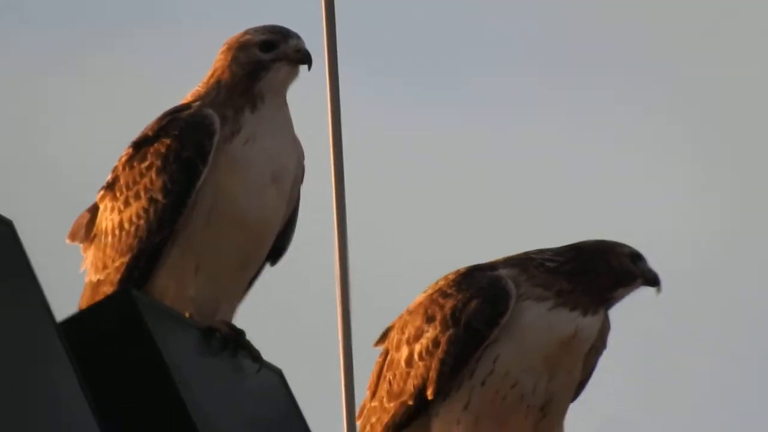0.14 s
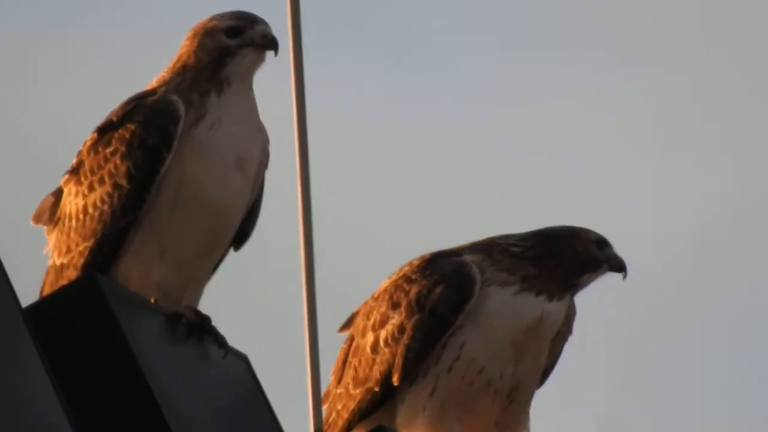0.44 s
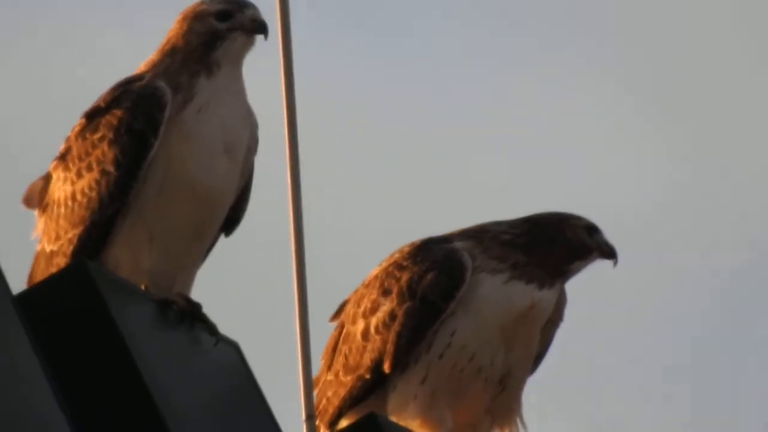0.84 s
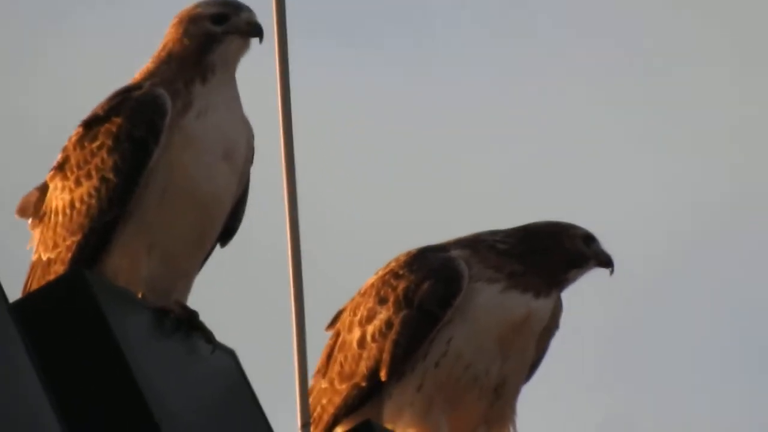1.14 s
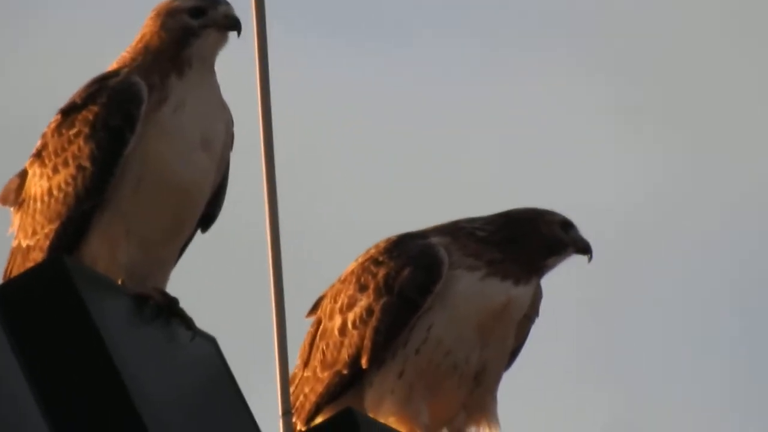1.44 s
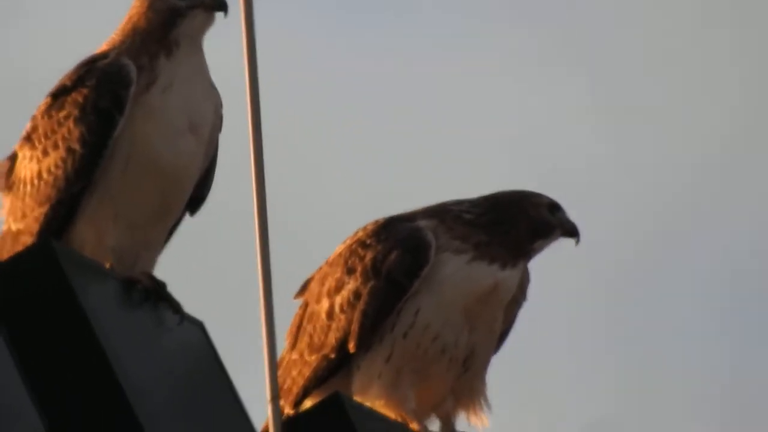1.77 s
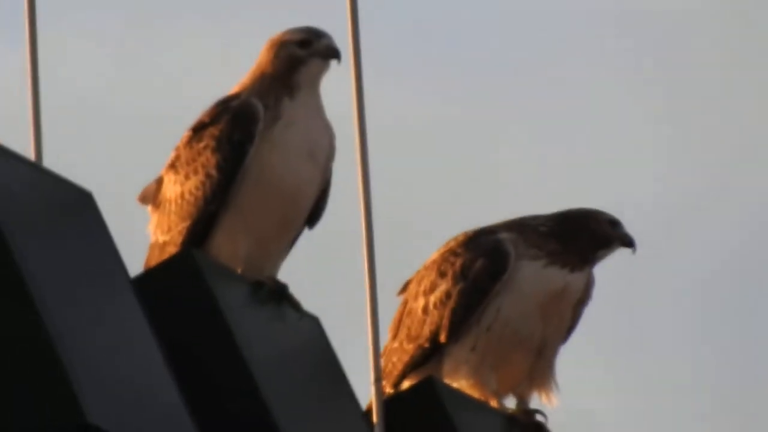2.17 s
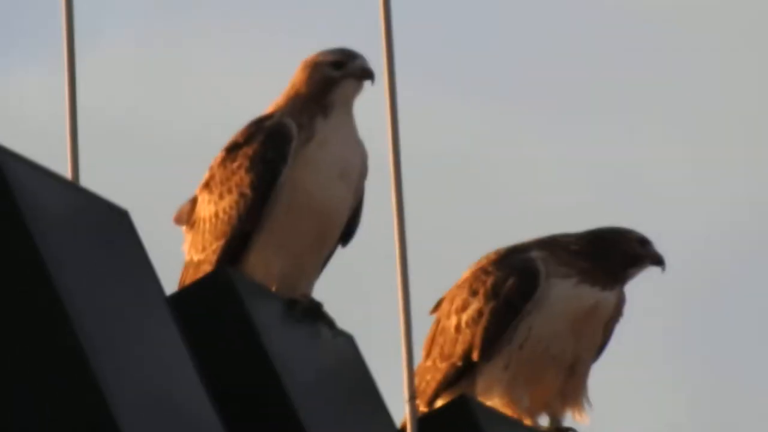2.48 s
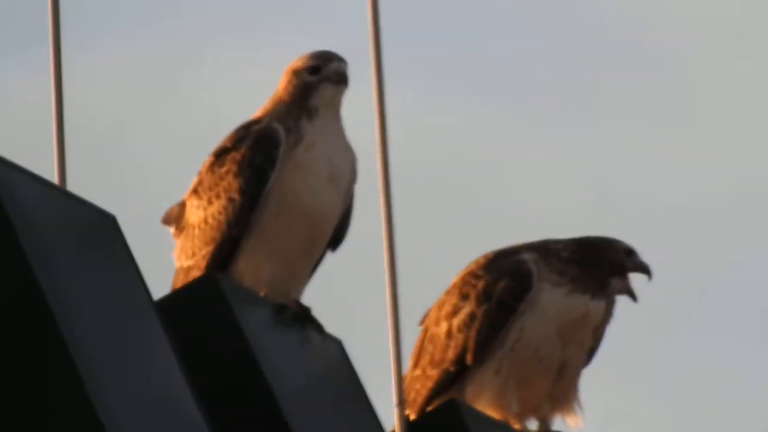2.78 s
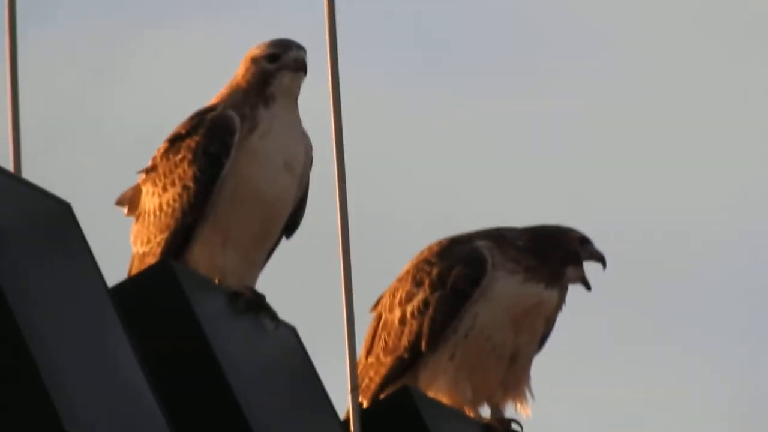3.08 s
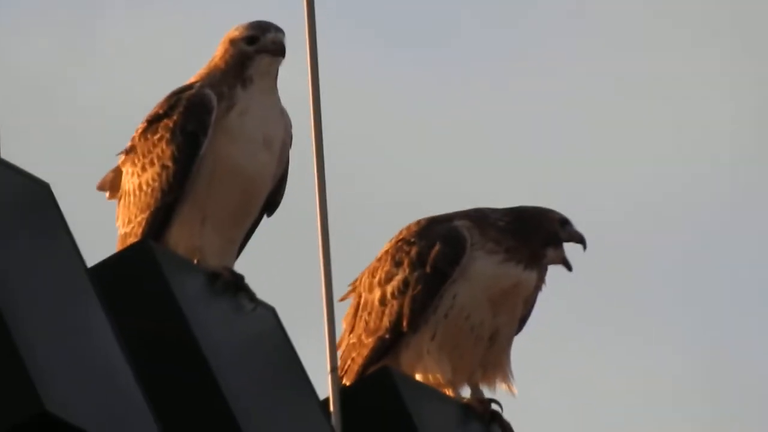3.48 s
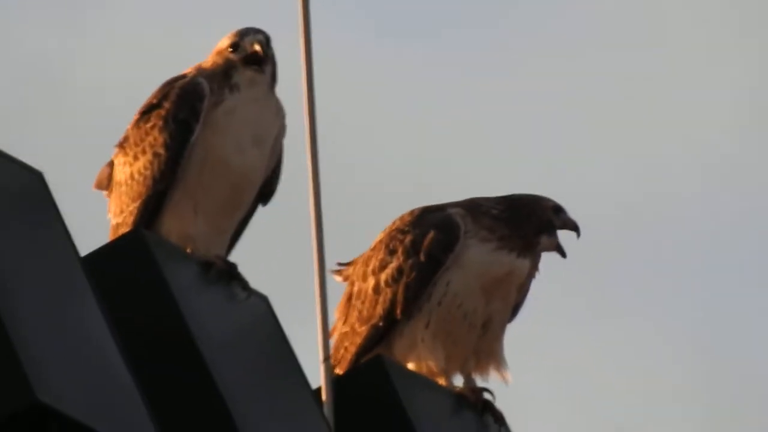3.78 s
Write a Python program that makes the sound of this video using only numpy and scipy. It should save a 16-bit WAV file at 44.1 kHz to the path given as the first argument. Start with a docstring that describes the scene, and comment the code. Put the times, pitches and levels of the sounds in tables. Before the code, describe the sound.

A hawk screams once, harsh and raspy, over a steady low outdoor drone.

```python
"""A hawk on a roof screams once, hoarsely: throat-filtered rasp pulses under a lower voice, whistles and yelps.
Before it the camera's lens motor whirs for a second: shaped hiss, gear ticks and whines tied to the gear speed.
Meanwhile fingers creak and click on the plastic body: slip pulses through resonances, and decaying modes.
Behind lies a drone of machinery and far traffic: wavering tones over shaped noise.
"""
import sys
import numpy as np
from scipy import signal
from scipy.fft import rfft, irfft, next_fast_len
from scipy.io import wavfile
from scipy.ndimage import uniform_filter1d, map_coordinates

SR = 44100
rng = np.random.default_rng(int(sys.argv[2]) if len(sys.argv) > 2 else 0)


def transcribe(u):
    """Save the signal u as a 16-bit wav file named by the first command-line argument.

    u: samples, shape (n,) or (channels, n), limited to [-1, 1]; the rate is SR.
    q: integer samples, one column per channel.
    """
    v = np.clip(np.atleast_2d(u).T, -1, 1)
    q = np.round(v * 32767).astype(np.int16)
    wavfile.write(sys.argv[1], SR, q)


N = 172872


def amp(db):
    """Decibels to a linear gain."""
    return 10 ** (np.asarray(db) / 20)


def unit(x):
    """x scaled to rms 1."""
    return x / np.sqrt(np.mean(x ** 2) + 1e-20)


def along(points, hz):
    """Interpolate (f, value) points on a log frequency axis."""
    f, v = np.transpose(points)
    return np.interp(np.log(hz + 1), np.log(f + 1), v)


def curves(rows):
    """One value per sample for each column, and a gate that is open while the table lasts."""
    s, *cols = np.transpose(rows)
    t = np.arange(N) / SR
    is_open = 1. * (t > s[0]) * (t < s[-1])
    gate = uniform_filter1d(is_open, size=400, mode="nearest")
    return [np.interp(t, s, c) for c in cols] + [gate]


def wobble(rate):
    """A smooth random curve, rate knots a second."""
    knots = rng.standard_normal(int(N * rate / SR) + 4)
    return map_coordinates(knots, [np.arange(N) * rate / SR])


def tone_phase(hz):
    """Running phase in radians of a tone whose pitch follows the curve hz."""
    return np.cumsum(2 * np.pi * hz) / SR


def filtered(x, response):
    """x times a complex response of frequency."""
    m = next_fast_len(N + SR // 2)
    return irfft(rfft(x, m) * response(np.fft.rfftfreq(m, 1 / SR)), m)[..., :N]


def resonant(x, peaks):
    """x through parallel (f, width, level) resonances of alternating sign."""
    def response(f):
        return sum((-1) ** k * amp(db) * 1j * f * w / (c * c - f * f + 1j * f * w)
                   for k, (c, w, db) in enumerate(peaks))
    return filtered(x, response)


def soft(x, hz):
    """A steep roll-off above hz."""
    return filtered(x, lambda f: 1 / (1 + 1j * f / hz) ** 4)


def stroke(s, length, shape):
    """A hump from s lasting length seconds; small shape = flat top."""
    progress = np.clip((np.arange(N) / SR - s) / length, 0, 1)
    return np.abs(np.sin(np.pi * progress)) ** shape * (np.arange(N) < (s + length) * SR)


def pulses(rate, jitter, scatter_db):
    """Clicks at about rate a second, uneven in time and size."""
    turns = np.cumsum(rate * np.exp(jitter * wobble(np.mean(rate) / 2))) / SR
    return np.diff(np.floor(turns), prepend=0) * amp(scatter_db * rng.standard_normal(N))


def rush(spectrum, alike, patchy_db):
    """Stereo noise of rms 1 with patches of random gain."""
    z = signal.stft(rng.standard_normal((2, N)), nperseg=512)[2]
    field = uniform_filter1d(rng.standard_normal(z.shape[1:]), size=6, axis=0)
    field = uniform_filter1d(field, size=14, axis=1)
    pair = signal.istft(z * amp(patchy_db * unit(field)), nperseg=512)[1][:, :N]

    def mid_side(hz):
        turn = np.arccos(np.clip(along(alike, hz), -1, 1)) / 2
        return amp(along(spectrum, hz)) * [np.cos(turn), np.sin(turn)]
    mid, side = filtered(pair, mid_side)
    return unit(np.array([mid + side, mid - side]))


def pan(db):
    """Left and right gains; positive db favours the left."""
    return amp([[db / 2], [-db / 2]])


# Breathy scream before its level trim: t/s, level/dB, upper throat band relative level/dB
RASP = [(2.845, -54, -21), (2.866, -41.5, -19), (2.9, -43.5, -9), (2.94, -41, -1), (3.0, -39.5, -4.5),
        (3.08, -38.5, -8.5), (3.2, -40, -8), (3.55, -39.5, -6), (3.7, -38.5, -9), (3.93, -39.5, -7.5)]
# Throat resonances, each passed twice: f/Hz, width/Hz, level/dB
THROAT = [(1780, 460, -4), (2293, 330, 3.5), (2876, 640, 3), (3730, 570, -4.5)]
# Upper throat resonances, each passed twice: f/Hz, width/Hz, level/dB
UPPER_THROAT = [(4440, 960, 0.44), (5330, 690, 2.6), (5844, 450, -0.41)]


def rasp():
    """Uneven membrane pulses and breath noise excite two bands of throat resonance."""
    db, upper_db, gate = curves(RASP)
    source = pulses(np.full(N, 1323), jitter=.5, scatter_db=-4.5)
    source = unit(source - source.mean()) + 2.0 * rng.standard_normal(N)  # pulses plus breath
    low, high = (unit(resonant(resonant(source, p), p)) for p in (THROAT, UPPER_THROAT))
    low_gain = amp(-3 + 1.7 * wobble(60))
    high_gain = amp(upper_db + 1.5 * wobble(60))
    return gate * amp(db) * (low_gain * low + high_gain * high)


# Glide of the lower voice: t/s, f/Hz
VOICE = [(3.09, 1390), (3.13, 1347), (3.17, 1298), (3.25, 1288), (3.31, 1259), (3.37, 1284), (3.425, 1320),
         (3.51, 1303), (3.56, 1358), (3.7, 1375), (3.76, 1383)]
# Spells in which it locks in: start t/s, end t/s, fundamental level/dB, even overtones level/dB before trim
SPELLS = [(3.09, 3.162, -46, -45.5), (3.166, 3.228, -45, -41.5), (3.226, 3.428, -44.5, -41.5),
          (3.501, 3.562, -49.5, -43), (3.586, 3.676, -56, -49), (3.686, 3.755, -54.5, -50)]
RAGGED_FROM_S, RAGGED = 3.53, 3  # late on, pitch and fundamental shake this many times more


def lower_voice():
    """A shaky periodic voice of fundamental, second and fourth harmonics locks in by spells."""
    hz, _ = curves(VOICE)
    ragged = np.where(np.arange(N) > RAGGED_FROM_S * SR, RAGGED, 1)
    phase = tone_phase(hz + 15 * ragged * wobble(400))
    first = amp(1.8 * ragged * wobble(60)) * np.sin(phase)
    even = amp(2.2 * wobble(150)) * (np.sin(2 * phase) + amp(-14) * np.sin(4 * phase))
    return sum(stroke(start, end - start, 0.18) * (amp(first_db + 3) * first + amp(even_db + 6.0) * even)
               for start, end, first_db, even_db in SPELLS)


def whistle(rows, rough, multiple=1):
    """A sine whose pitch and size shake more the rougher it is."""
    hz, db, gate = curves(rows)
    phase = tone_phase(hz + 300 * rough * wobble(500))
    return gate * amp(db + 3 + 9 * rough * wobble(400)) * np.sin(multiple * phase)


# Opening arch of the thin upper whistle: t/s, f/Hz, level/dB
WHISTLE = [(2.86, 2680, -54), (2.876, 3050, -37), (2.915, 3310, -36.5), (2.93, 3560, -44.5),
           (2.945, 3400, -35.5), (2.99, 3360, -45), (3.03, 3094, -42), (3.09, 3040, -41.5),
           (3.12, 2745, -67)]
# Partials while the whistle doubles its period: multiple of its pitch, level/dB
HALVES = [(.5, -19), (1.5, -8), (2.5, -25)]
# Strength of the period doubling: t/s, level/dB
DOUBLING = [(2.87, -3), (2.93, -4), (3.05, 1)]


def opening_whistle():
    """A rough sine, with partials at half-multiples while its period doubles."""
    db, gate = curves(DOUBLING)
    partials = sum(amp(h_db) * whistle(WHISTLE, rough=.33, multiple=k) for k, h_db in HALVES)
    return whistle(WHISTLE, rough=0.27) + gate * amp(db) * partials


# Late return of the whistle: t/s, f/Hz, level/dB
WHISTLE_LATE = [(3.42, 3020, -48), (3.45, 3070, -41.5), (3.505, 3045, -41), (3.53, 2833, -56.5),
                (3.565, 2918, -39.5), (3.6, 3060, -41.5), (3.635, 3000, -38.5), (3.76, 3108, -37.5),
                (3.86, 3010, -37.5), (3.885, 2980, -40), (3.93, 3090, -38)]
# Rougher strands under it: offset f/Hz, relative level/dB
STRANDS = [(-320, -13), (-700, -7.5)]


def late_whistle():
    """A rough sine and two lower strands, held in a steep band from 2100 to 3300 Hz."""
    late = whistle(WHISTLE_LATE, rough=.3)
    late = late + sum(whistle(np.add(WHISTLE_LATE, [0, *strand]), rough=0.442) for strand in STRANDS)
    return filtered(late, lambda f: 1 / (1 + (f / 3300) ** 24) / (1 + (2100 / (f + 1)) ** 24))


# Cracks as the voice sets in: t/s, length/s, f/Hz, level/dB before trim
YELPS = [(2.862, 0.016, 2550, -43), (2.914, 0.011, 4910, -38.5), (2.932, 0.015, 4700, -36.5),
         (3.001, 0.063, 1034, -56.5)]


def yelps():
    """Brief sine bursts share one pitch shake, scaled to each pitch."""
    shake = 120 * wobble(300)
    return sum(amp(db + 6.5) * stroke(s, length, 0.68) * np.sin(tone_phase(hz + shake * hz / 5000))
               for s, length, hz, db in YELPS)


def hawk():
    """Rasping membrane pulses in the throat, with pitched voices and cracks on top."""
    return rasp() + lower_voice() + yelps() + opening_whistle() + late_whistle()


# Decay of the echo off nearby walls: f/Hz, t60/s
AIR = [(1000, 0.038), (9000, 0.69)]


def walls(x):
    """Each frequency of the echo dies at its own speed, after a gap of 500 samples."""
    hz, t, z = signal.stft(rng.standard_normal((2, SR // 2)), SR, nperseg=256)
    tail = signal.istft(z * amp(-60 * t / along(AIR, hz)[:, None]), SR, nperseg=256)[1]
    tail = tail / np.linalg.norm(tail[0])
    return signal.fftconvolve(np.pad(x, (500, 0))[None], tail, axes=1)[:, :N]


# Motor swell before panning: t/s, level/dB
MOTOR = [(1.578, -56), (1.59, -45), (1.62, -40.5), (2.2, -41.5), (2.31, -47.5), (2.325, -65), (2.385, -57),
         (2.392, -36.5), (2.43, -41.5), (2.448, -52), (2.48, -52.5), (2.494, -37.5), (2.505, -75)]
# Gear: t/s, turns a second, tick level/dB relative to the hiss
GEAR = [(1.68, 45.3, -22), (1.83, 43.5, -11), (1.93, 46, -6), (2.05, 45.8, -4), (2.21, 44.3, -6),
        (2.26, 42, -20)]
# Colour of the gear hiss: f/Hz, relative level/dB
WHIR = [(500, -6.5), (860, -4), (1250, -3.5), (1500, -13.5), (2300, -13.5), (2650, -8), (3400, -25),
        (4100, -16.5), (4800, -6), (5400, 3), (5800, -2.5), (6450, 4), (7800, -5), (8300, -12.5),
        (10500, -26), (11200, -42)]
# Gear tick resonance, passed twice: f/Hz, width/Hz, level/dB
TICK = [(6396, 220, 0)]
# Motor whine: multiple of the gear speed, peak level/dB relative to the hiss rms
WHINE = [(21, -13), (26.5, -15.5), (59, -19.5)]
# Stereo likeness of the hiss: f/Hz, left-right likeness
MOTOR_ALIKE = [(500, 0.53), (3000, 0.94), (5000, 0.11)]
HALF_TURN_DB, TICK_AT_S = -12, 2.008  # weaker second tick; time that anchors the tick count


def lens_motor():
    """Even gear hiss, and two ticks a turn, one much weaker; whines follow the gear speed."""
    db, gate = curves(MOTOR)
    speed, tick_db, _ = curves(GEAR)
    turns = np.cumsum(speed) / SR
    count = np.floor(2 * (turns - turns[round(TICK_AT_S * SR)]))
    tick_gain = amp(HALF_TURN_DB * (count % 2) + 1.5 * rng.standard_normal(N))
    ticks = np.diff(count, prepend=count[0]) * tick_gain
    puffs = signal.fftconvolve(ticks, np.exp(-np.arange(400) / (.0018 * SR)))[:N]
    ticks = unit(ticks) + .5 * unit(puffs * rng.standard_normal((2, N)))
    ticks = unit(resonant(resonant(ticks, TICK), TICK))
    hiss = rush(WHIR, MOTOR_ALIKE, patchy_db=.5) * (1 + .08 * unit(puffs))  # swells slightly with ticks
    whine = 0
    for multiple, whine_db in WHINE:
        uneven_speed = speed + 0.7 * wobble(150) + 0.5 * wobble(12)
        whine = whine + amp(whine_db + 5 * wobble(25)) * np.sin(tone_phase(multiple * uneven_speed))
    return gate * amp(db) * pan(4.5) * (hiss + amp(tick_db) * ticks + whine)


# Creaks of the grip: t/s, length/s, low ring level/dB, bright scrape level/dB (before trim and pan), ring f/Hz
CREAKS = [(1.634, .03, -45.5, -52, 680), (1.961, 0.031, -44, -84, 773), (2.046, 0.061, -43.5, -39.5, 630),
          (2.064, 0.037, -40.5, -55, 790), (2.115, 0.038, -47, -41, 1009), (2.107, 0.094, -44, -50, 619),
          (2.182, 0.045, -40.5, -40, 775), (2.306, 0.022, -39, -47, 715), (2.327, 0.051, -34.5, -41.5, 745),
          (2.413, 0.03, -38.5, -53, 790), (2.437, 0.045, -43.5, -42, 665), (2.468, 0.031, -41, -42, 773)]
# Resonances of the plastic body at rest: f/Hz, width/Hz, level/dB
SHELL = [(623, 33, 1.5), (986, 60, 0.5), (1237, 50, 0), (1740, 76, 0), (2160, 83, -4), (2510, 154, -2),
         (2740, 120, 0.5), (3600, 260, -5.5), (4920, 290, -4.5)]
SHELL_BEND = 0.06  # the squeezed shell's resonances drift by up to this share
SLIPS_PER_S, RING_RISE_HZ_PER_S, RING_SHAKE_HZ = 500, 500, 18


def grip():
    """Skin slips in quick jerks over the shell; each creak adds a squeak on a rising note."""
    out, t = np.zeros((2, N)), np.arange(N) / SR
    slips = pulses(np.full(N, SLIPS_PER_S), jitter=.6, scatter_db=2.6)
    bend = np.clip(wobble(14), -1, 1)
    scrape = 0
    for k in (-1, 0, 1):  # crossfade between lowered, resting and raised resonances
        share = np.clip(1 - np.abs(bend - k), 0, 1) ** .5
        scrape = scrape + share * resonant(slips, np.multiply(SHELL, [1 + k * SHELL_BEND, 1, 1]))
    scrape = unit(soft(scrape, hz=7760))
    shake, size = RING_SHAKE_HZ * wobble(150), amp(2.2 * wobble(120))
    for s, length, ring_db, scrape_db, hz in CREAKS:
        rise = RING_RISE_HZ_PER_S * (t - s - length / 2)
        ring = size * np.sin(tone_phase(hz + shake + rise))
        creak = amp(ring_db + 5.5) * ring + amp(scrape_db) * scrape
        out += pan(-3.5) * stroke(s, length, 0.47) * creak
    return out


# Dull knocks on the shell: t/s, level/dB before trim and pan, f/Hz
KNOCKS = [(1.5836, -27, 3600), (1.8681, -14, 1256), (2.3064, -22, 1264), (2.382, -15, 2005),
          (2.4148, -18, 1224)]
# Sharp latch snaps: t/s, level/dB before trim and pan
SNAPS = [(1.5938, -28.5), (1.8799, -7.5), (2.392, -26)]
# Latch modes: f/Hz, level/dB, t60/s
LATCH = [(4360, 3.5, 0.01), (5830, 7, 0.012), (6600, 6, 0.0049), (8940, 1, 0.0036), (12300, -18, .003)]
KNOCK_T60_S, RIGHT_LAG_RAD = 0.033, 1.7
REBOUND_S, REBOUND_DB = .002, -5


def buttons():
    """Dull knocks on the shell and sharp, rebounding snaps of a latch, all as decaying modes."""
    out, t = np.zeros((2, N + SR)), np.arange(1500) / SR
    for s, db, hz in KNOCKS:
        modes = [(hz, 0), (hz * 1.51, -5), (hz * 0.605, -1), (hz * 2.99, -8)]
        ring = sum(amp(level - 60 * t / KNOCK_T60_S) * np.sin(2 * np.pi * f * t) for f, level in modes)
        thud = uniform_filter1d(rng.standard_normal(len(t)), size=11)
        ring += 2.5 * amp(-60 * t / KNOCK_T60_S) * thud
        attack = (1 - np.exp(-t / 0.00027)) ** 2
        out[:, round(s * SR):][:, :len(t)] += amp(db - 14.5) * ring * pan(3.3) * attack
    lag = np.array([[0], [RIGHT_LAG_RAD]])
    rebounds = [(s + REBOUND_S, db + REBOUND_DB) for s, db in SNAPS]
    attack = (1 - np.exp(-t / 0.00031)) ** 2
    for s, db in [*SNAPS, *rebounds]:
        ring = sum(amp(level + rng.normal(0, 1) - 60 * t / t60) * np.sin(2 * np.pi * hz * t - lag)
                   for hz, level, t60 in LATCH)
        out[:, round(s * SR):][:, :len(t)] += amp(db - 5) * pan(3) * ring * attack
    return out[:, :N]


# Machine tones: f/Hz, starting level/dB before trim, waver/Hz, drift/dB a second
HUM = [(54.3, -47, 2, 1.5), (77.65, -36.5, 2.874, 1), (105.75, -28.5, 1.19, -0.5),
       (157.96, -36.5, 1.99, -0.5), (425, -49.5, 0.98, -2)]
# Colour of the broad rumble before its low cut: f/Hz, relative level/dB
RUMBLE = [(20, -28), (84, -6), (109, -0.5), (176, -5), (215, -11), (300, -23.5), (426, -24), (600, -34.5),
          (780, -81)]
# Colour of the thin hiss: f/Hz, relative level/dB
HISS = [(350, -23), (600, -2.5), (1180, -11.5), (1700, -15.5), (2800, -21), (3500, -18), (6850, -16),
        (7700, -22), (11000, -28), (15600, -35)]
# Stereo likeness of rumble and hiss: f/Hz, left-right likeness
ALIKE = [(400, 0.99), (1400, 0.87), (3100, 0.35), (7000, 0.079)]


def drone():
    """Wavering machine tones over a broad rumble and a thin hiss."""
    t = np.arange(N) / SR
    hum = 0
    for hz, db, waver, drift in HUM:
        level = amp(db + 2.5 + drift * t + 1.09 * wobble(4.764))
        hum = hum + level * np.sin(tone_phase(hz + waver * wobble(12)))
    edges = uniform_filter1d(np.ones(N), size=800, mode="constant")  # eases the tones at both ends
    rumble = filtered(rush(RUMBLE, ALIKE, patchy_db=0.85), lambda f: 1 / (1 + (32 / (f + 1)) ** 6))
    hiss = rush(HISS, ALIKE, patchy_db=.5)
    return edges * hum + amp(-30.5) * rumble + amp(-53) * hiss


def scene():
    """Hawk, its echo and the drone lean slightly left; the handling sounds have their own places."""
    bird = hawk()
    far = bird + amp(-10.5) * walls(bird) + drone()
    return pan(0.82) * far + lens_motor() + grip() + buttons()


def record(dry):
    """A sharp band limit: nothing passes from 15700 Hz up."""
    return filtered(dry, lambda hz: hz < 15700)


dry = scene()
out = record(dry)
transcribe(out)
```